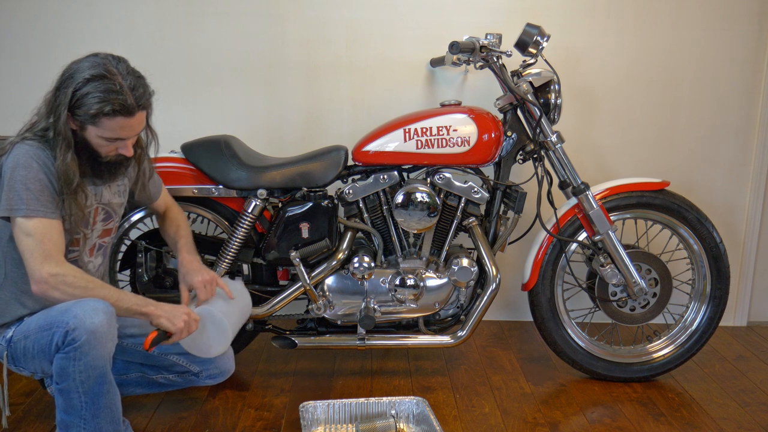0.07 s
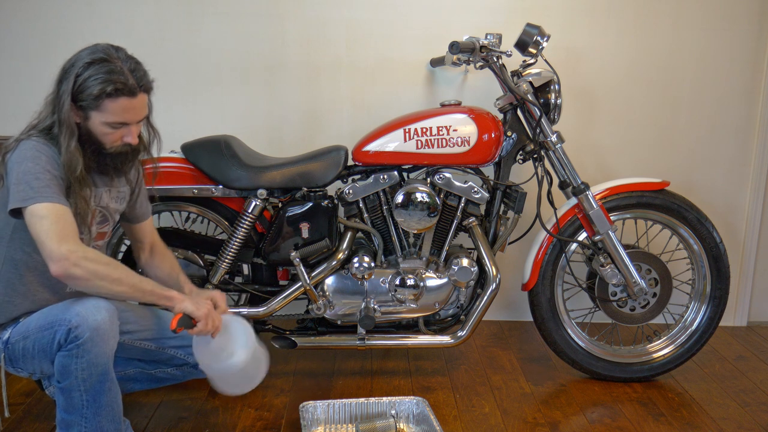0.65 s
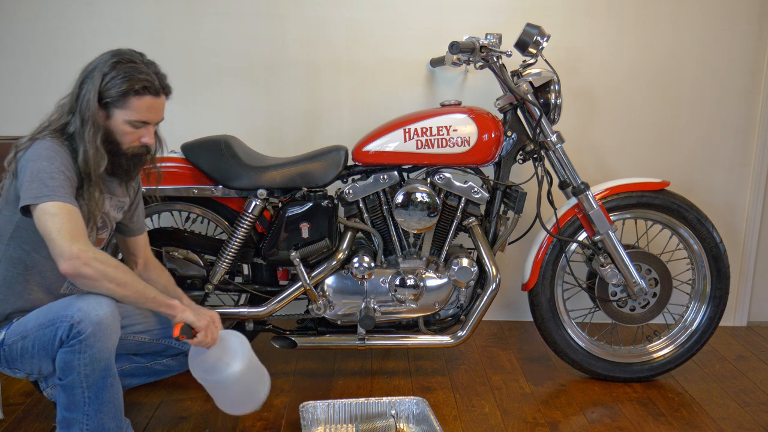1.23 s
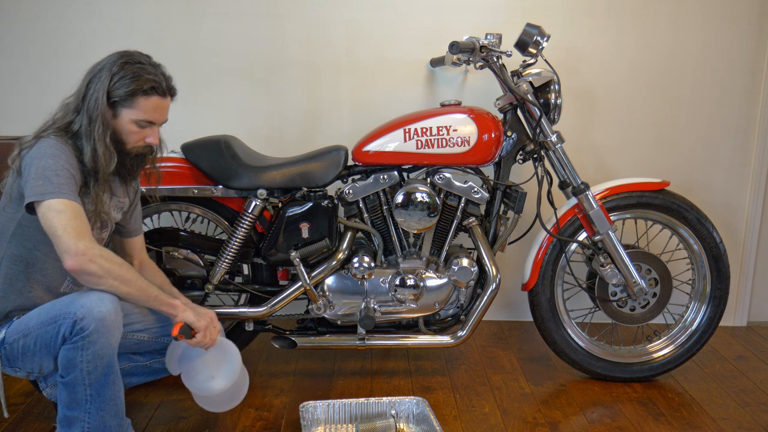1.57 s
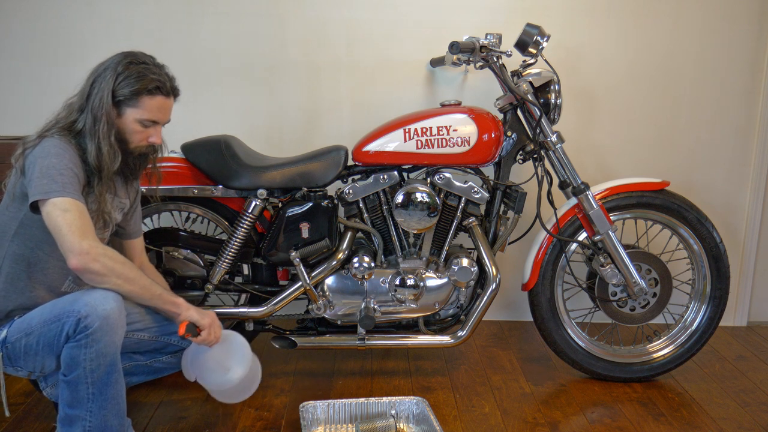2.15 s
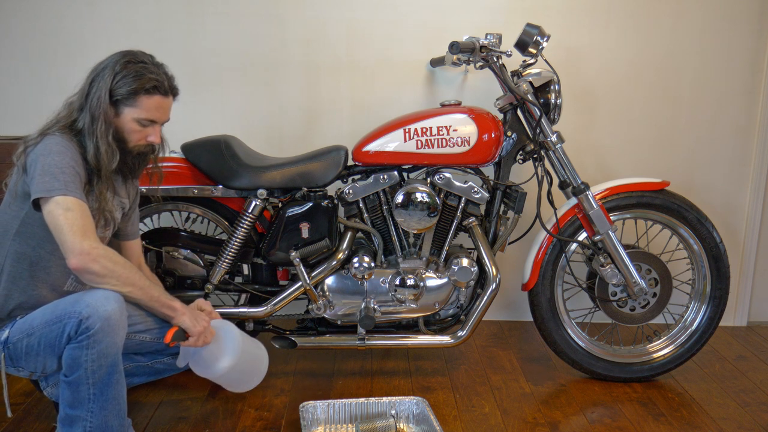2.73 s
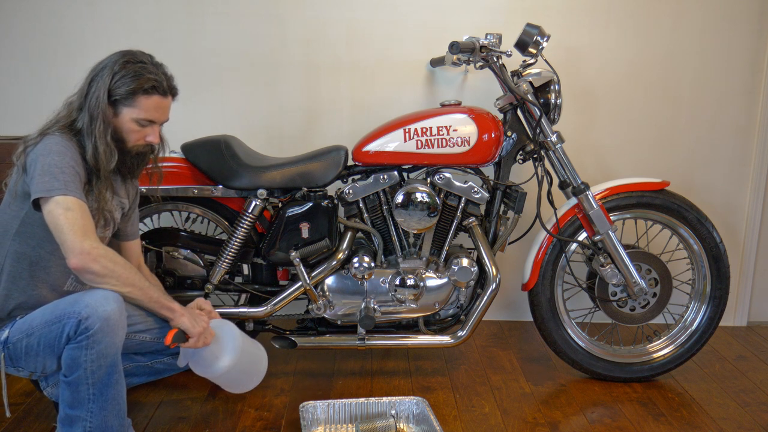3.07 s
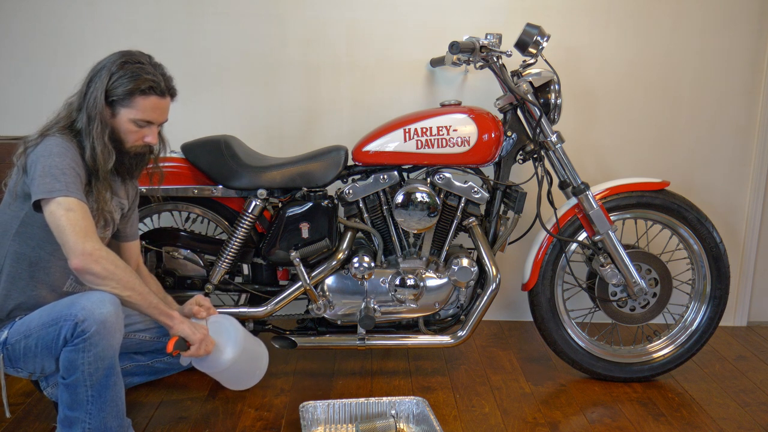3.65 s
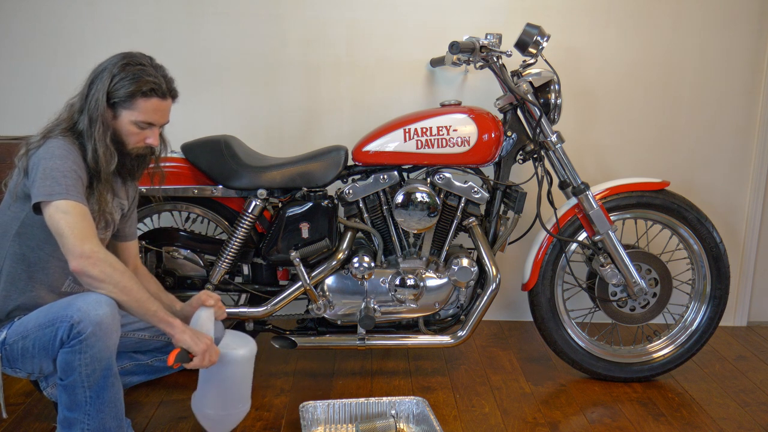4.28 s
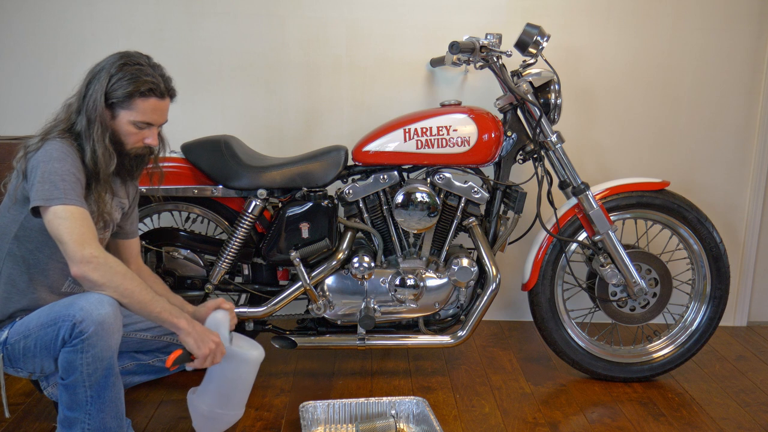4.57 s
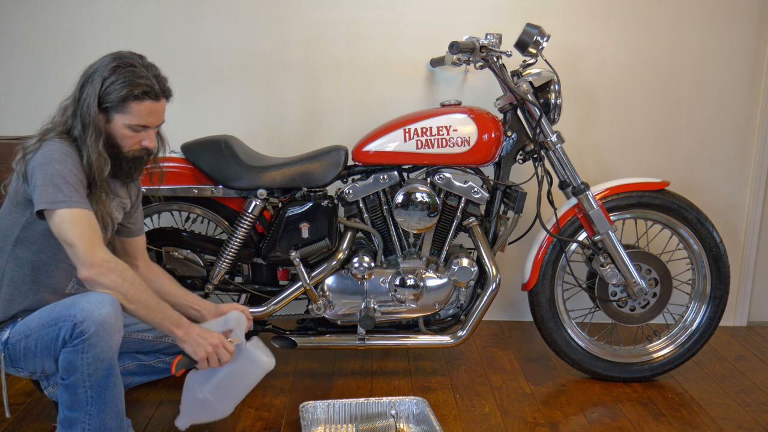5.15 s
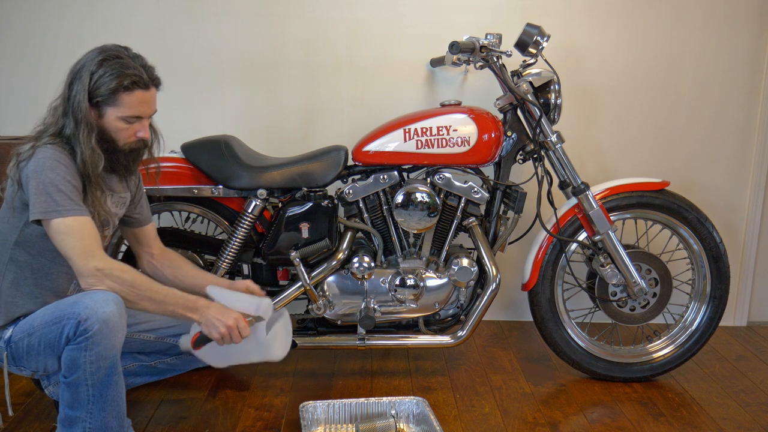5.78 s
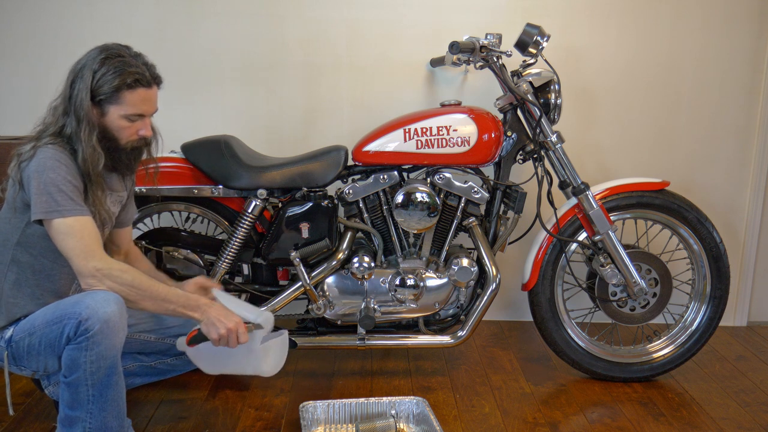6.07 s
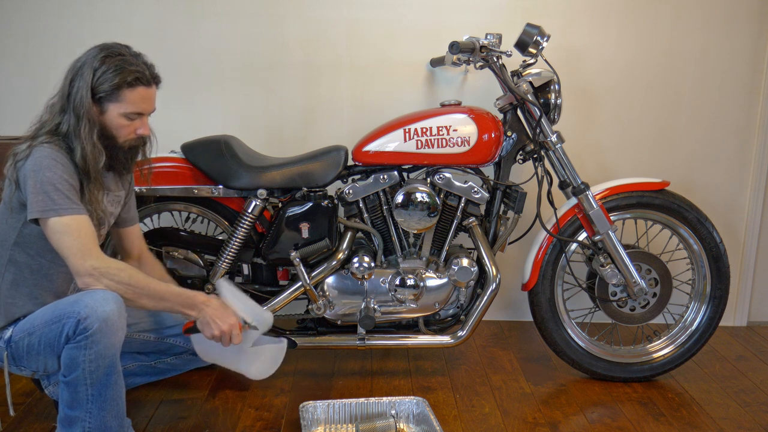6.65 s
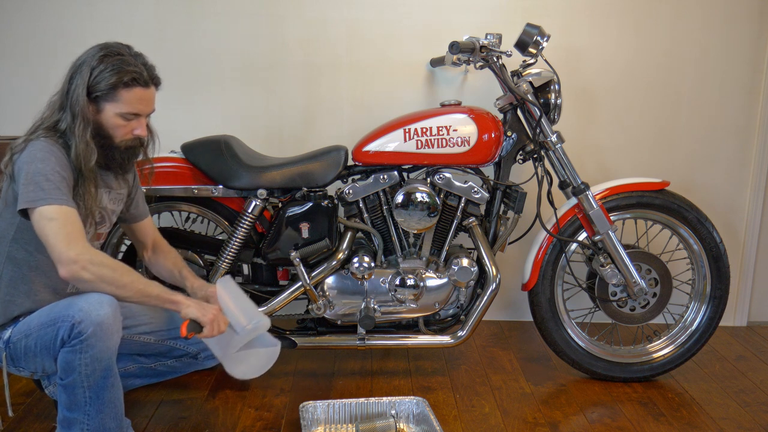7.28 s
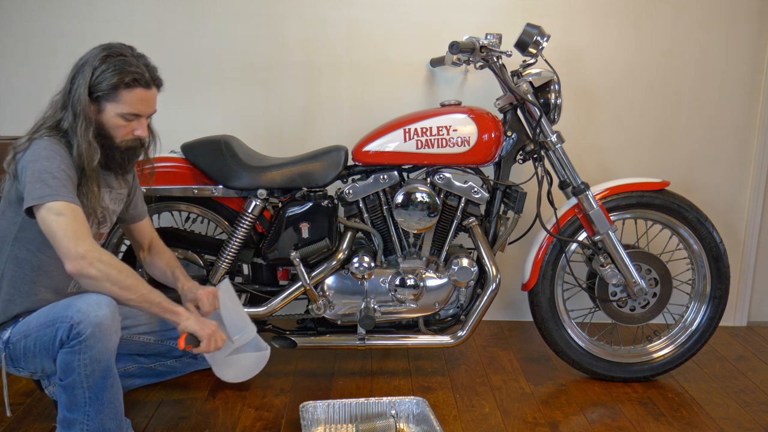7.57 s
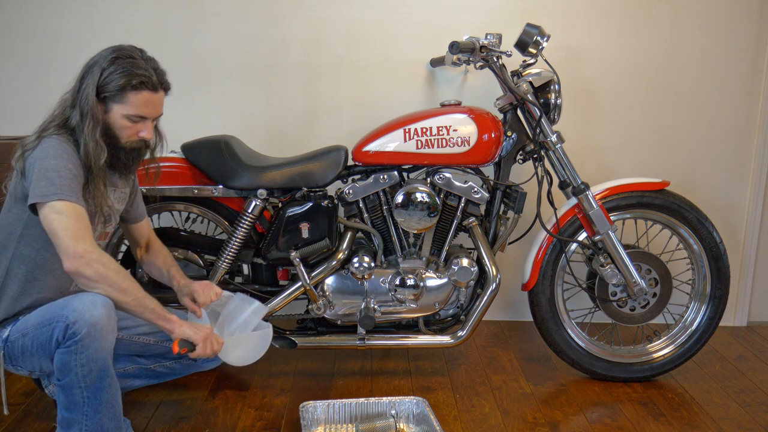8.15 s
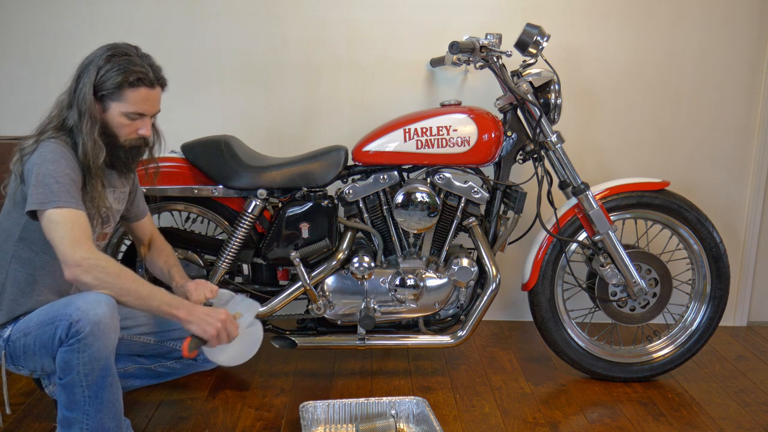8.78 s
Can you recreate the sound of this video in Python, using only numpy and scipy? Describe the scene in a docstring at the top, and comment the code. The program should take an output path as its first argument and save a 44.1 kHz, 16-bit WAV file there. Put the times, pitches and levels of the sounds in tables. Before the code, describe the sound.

A blade rasps through a hollow plastic jug in uneven bursts, with sharp snaps, loud pops and dull bumps.

```python
"""A hand blade rasps into a thin plastic jug in a garage, over a faint low hum and soft room noise.
The blade sticks and slips with each push, tearing tiny cracks, and the plastic snaps as it breaks through.
The wall buckles with loud pops near the start and near the middle. Hands bump the jug, and the blade
squeaks where it catches. The hollow jug rings with all of this, with different tones once it is slit,
and the room adds short echoes."""
import sys
import numpy as np
from scipy import signal
from scipy.fft import rfft, irfft, next_fast_len
from scipy.io import wavfile
from scipy.ndimage import uniform_filter1d

SR = 44100
rng = np.random.default_rng(int(sys.argv[2]) if len(sys.argv) > 2 else 0)


def log_audio(samples):
    """Write samples as a 16-bit WAV file to the path given in sys.argv[1]."""
    # one column per channel
    frames = np.atleast_2d(samples).T
    # limit to full scale, then quantise
    limited = np.clip(frames, -1, 1)
    pcm = np.round(limited * 32767).astype(np.int16)
    wavfile.write(sys.argv[1], SR, pcm)


N = 397341

# how strong each frequency is in one crack of the plastic: f/Hz, level/dB
CRACK_SPECTRUM = [(40, -20.5), (100, -9), (170, -13.5), (230, -2), (380, 1.5), (900, 3.5), (1300, 0.5),
                  (2100, 1), (3200, -3.5), (5000, -9), (7000, -16.5), (10000, -23.5), (15500, -38)]


def amp(db):
    """Turns decibels into a factor to multiply by."""
    return 10 ** (np.asarray(db) / 20)


def unit_level(x):
    """Scales a sound to an average (rms) level of 1."""
    return x / np.sqrt(np.mean(x ** 2) + 1e-20)


def set_attack_level(x, db, samples=1100):
    """Scales a sound so that its first moments have the given level."""
    return amp(db) * x / np.sqrt(np.mean(x[:samples] ** 2) + 1e-20)


def look_up(points, hz):
    """Reads between the rows of a table, along a logarithmic frequency axis."""
    f, value = np.transpose(points)
    return np.interp(np.log(hz + 1), np.log(f + 1), value)


def add(mix, start_s, sound):
    """Adds a sound to the mix at the given time."""
    part = mix[max(round(start_s * SR), 0):][:len(sound)]
    part += sound[:len(part)]


def click(spectrum, size=4096):
    """The sharpest click that has the given spectrum."""
    hz = abs(np.fft.fftfreq(size, 1 / SR))
    log_gain = np.log(amp(look_up(spectrum, hz)))
    return np.fft.ifft(np.exp(np.conj(signal.hilbert(log_gain)))).real[:size // 2]


def noise(spectrum, channels):
    """Steady noise of level 1 with the given spectrum."""
    size = next_fast_len(N)
    colour = amp(look_up(spectrum, np.fft.rfftfreq(size, 1 / SR)))
    white = rng.standard_normal((channels, size))
    return unit_level(irfft(rfft(white) * colour, size))[:, :N]


def three_bands(x, thud_top_hz=700, crack_top_hz=3500):
    """Splits a sound into thud (low), crack (middle) and fizz (high)."""
    edges = [(thud_top_hz, "low"), ([thud_top_hz, crack_top_hz], "band"), (crack_top_hz, "high")]
    return [signal.sosfilt(signal.butter(3, hz, kind, fs=SR, output="sos"), x) for hz, kind in edges]


def tiny_cracks(size, per_s, spread_db):
    """Tiny breaks at random moments; a wide spread makes a few much larger than the rest."""
    heights = amp(spread_db * np.minimum(rng.exponential(1, size), 4)) * rng.choice([-1, 1], size)
    return unit_level(heights * (rng.random(size) < per_s / SR))


def rasp(slip_db=1.5, slips_per_s=90, fade_s=0.0027):
    """The blade sticks and slips, tearing the wall in clumps of tiny cracks; each push builds and eases."""
    # pushes of the blade: start/s, build-up/s, easing/s, then at full force thud/dB, crack/dB, fizz/dB
    pushes = [(0.0, 0.004, 0.13, -43, -49, -54), (0.1, 0.044, 0.07, -39, -48.5, -49.5),
              (0.25, 0.059, 0.18, -36, -39, -57.5), (0.89, 0.12, 0.07, -44, -49.5, -61),
              (1.119, 0.068, 0.1, -57, -62, -67.5), (1.31, 0.071, 0.04, -57, -56, -58),
              (2.08, 0.039, 0.34, -58, -58.5, -65), (2.17, 0.11, 0.35, -57, -58.5, -62.5),
              (2.4, 0.091, 0.81, -66.5, -66, -68), (2.97, 0.24, 0.087, -56, -57.5, -63),
              (3.19, 0.07, 0.076, -53.5, -57, -61.5), (3.4, 0.26, 0.085, -53.5, -53.5, -57.5),
              (3.82, 0.077, 0.038, -39.5, -43.5, -48.5), (3.895, 0.061, 0.035, -24.5, -22.5, -28.5),
              (4.13, 0.059, 0.13, -32, -38, -48.5), (4.26, 0.016, 0.12, -43, -34, -46),
              (4.39, 0.038, 0.22, -51, -35, -44), (4.66, 0.077, 0.31, -51, -47.5, -56),
              (4.761, 0.16, 0.11, -55.5, -40, -47.5), (5.27, 0.04, 0.07, -48, -63, -58.5),
              (5.42, 0.024, 0.11, -42, -38, -49.5), (5.621, 0.054, 0.051, -42.5, -42.5, -46),
              (5.73, 0.16, 0.055, -38, -36.5, -41.5), (5.95, 0.084, 0.31, -51, -56, -74),
              (6.09, 0.059, 0.16, -44, -32, -46.5), (6.18, 0.13, 0.2, -37, -40, -55),
              (6.475, 0.016, 0.44, -56, -45, -50.5), (6.65, 0.027, 0.11, -43, -39, -46.5),
              (6.69, 0.065, 0.13, -42.5, -41, -50), (6.87, 0.033, 0.14, -55, -34, -43.5),
              (7.3, 0.069, 0.18, -69, -54.5, -61.5), (7.45, 0.091, 0.13, -47, -41, -46),
              (7.571, 0.075, 0.071, -49.5, -46, -51.5), (7.72, 0.19, 0.049, -47, -42.5, -49),
              (8.21, 0.053, 0.15, -45.5, -35, -43), (8.33, 0.15, 0.12, -38.5, -31.5, -41),
              (8.73, 0.072, 0.12, -45.5, -41.5, -51), (8.87, 0.064, 0.095, -46.5, -39, -45.5)]
    out, one_crack = np.zeros(N), click(CRACK_SPECTRUM)
    for start, build, ease, *levels_db in pushes:
        t = np.arange(0, max(build + ease, 0.03), 1 / SR)
        force_db = np.interp(t, [0, build, build + ease], [-17, 0, -23.5])
        slips = np.interp(t * slips_per_s, np.arange(500), rng.standard_normal(500))
        tear = tiny_cracks(len(t), per_s=2500, spread_db=2.0) * amp(slip_db * slips)
        tear = signal.fftconvolve(tear, one_crack)
        sound = signal.fftconvolve(tear, jug_ring(start, detune=0.034, ring_db=-1.5))
        bands = three_bands(flex(sound, depth_db=3.36)[:len(t)])
        sound = sum(unit_level(band) * amp(db + force_db) for band, db in zip(bands, levels_db))
        fade = np.clip(np.minimum(t, t[-1] - t) / fade_s, 0, 1)
        add(out, start, garage(fade * sound, tail_db=-3.5, echo_db=-12.5))
    return out


def jug_ring(at_s, detune, ring_db, size=10000, slit_s=4.03):
    """One click and the jug's ringing after it; the hand's grip shifts each tone a little."""
    # the tones of the whole jug and of the slit jug: f/Hz, level/dB, time to fade by 60 dB/s
    whole_tones = [(196, 13.5, 0.46), (231.2, 18.5, 0.15), (284, 12, 0.51), (351.6, 15, 0.33),
                   (415, 17.5, 0.14), (452, -1, 0.069), (574.5, -11.5, 0.2), (755.5, 6.5, 0.56),
                   (908, 6.5, 0.069), (954, 1, 0.11), (1160, -3, 0.22), (1447.6, 11, 0.095),
                   (1656, 3.5, 0.078), (2950, -6.5, 0.05)]
    slit_tones = [(159.7, 17.2, 0.22), (240, 6, 0.32), (347.3, 15.7, 0.52), (433.5, 13.4, 0.15),
                  (504.6, 9.1, 0.13), (598.6, 9.3, 0.11), (689, 7.7, 0.13), (922, 9.2, 0.059),
                  (1070, 8.8, 0.19), (1575, 2.9, 0.047), (1690, 1.8, 0.24), (2730, 2.5, 0.054),
                  (4210, 1.1, 0.081)]
    t = np.arange(size) / SR
    ring = np.zeros(size)
    ring[0] = 1
    for hz, db, decay_s in whole_tones if at_s < slit_s else slit_tones:
        damping = np.log(1000) / decay_s
        shifted_hz = hz * (1 + detune * rng.standard_normal())
        strength = amp(db + ring_db) * 2 * damping / SR
        ring += strength * np.exp(-damping * t) * np.cos(2 * np.pi * shifted_hz * t)
    return ring


def flex(x, depth_db):
    """As the plastic bends, its small ringing tones come and go."""
    spectra = signal.stft(x, nperseg=1024, noverlap=768)[2]
    wobble = uniform_filter1d(rng.standard_normal(spectra.shape), size=9, axis=1)  # smooth in time
    wobble = unit_level(uniform_filter1d(wobble, size=5, axis=0))  # and in frequency
    return signal.istft(spectra * amp(depth_db * wobble), nperseg=1024, noverlap=768)[1][:len(x)]


def garage(x, tail_db, echo_db, build_s=0.0021):
    """Adds echoes off floor and walls, and a fading tail that differs wherever the jug is held."""
    # how long the room rings: f/Hz, time to fade by 60 dB/s
    decay_times = [(100, 0.54), (260, 0.23), (700, 0.2617), (1840, 0.344), (4850, 0.3158), (14000, 0.3)]
    # echoes off the nearest surfaces: delay/s, level relative to echo_db/dB
    echoes = [(0.0026, -21), (0.0062, -21.5), (0.0107, -0.5), (0.0206, -15), (0.031, -14.5), (0.036, -14)]
    hz, t, spectra = signal.stft(rng.choice([-1., 1.], size=18000), SR, nperseg=256)
    decay = amp(-60 * t / look_up(decay_times, hz)[:, None])
    tail = signal.istft(spectra * decay * (1 - np.exp(-t / build_s)), SR, nperseg=256)[1]
    response = amp(tail_db) * tail / np.linalg.norm(tail)
    response[0] += 1  # the direct sound
    for delay, db in echoes:
        add(response, delay, amp([db + echo_db]))
    return signal.fftconvolve(x, response)


def hum(pitch_hz=97.6, waver=0.0031):
    """One low, slightly unsteady tone that fades away and partly returns."""
    # how loud the hum is: t/s, level/dB
    loudness = [(0, -58.5), (1.5, -57.5), (2.3, -61), (3.0, -65), (3.7, -65.5), (5.0, -76), (9.0, -68.5)]
    t = np.arange(N) / SR
    drift = np.interp(t * 4, np.arange(60), rng.standard_normal(60))
    cycles = np.cumsum(pitch_hz * (1 + waver * drift)) / SR
    return amp(np.interp(t, *np.transpose(loudness))) * unit_level(np.sin(2 * np.pi * cycles))


def room_noise(air_db=-59.5, hiss_db=-72):
    """Steady room noise, with a little hiss and rumble of its own in each channel."""
    # still air, the same in both channels: f/Hz, relative level/dB
    air_spectrum = [(20, -15.5), (42, -9), (65, -6), (100, -8), (160, -2.5), (300, -9.5), (440, -8),
                    (560, -17), (920, -16.5), (1300, -21.5), (3000, -23.5), (8000, -32.5), (15000, -38.5)]
    # each channel's own hiss and rumble: f/Hz, relative level/dB
    hiss_spectrum = [(12, -33), (20, -2.5), (171, -5), (452, -4.5), (597, -7), (649, -8.5), (2680, -10),
                     (15500, -13)]
    return amp(air_db) * noise(air_spectrum, channels=1) + amp(hiss_db) * noise(hiss_spectrum, channels=2)


def snaps():
    """The blade breaks through a bit of wall with a sharp crack."""
    # breaks in the wall: t/s, thud/dB, crack/dB, fizz/dB, pitch of the patch/Hz, rise/s, splintering/s
    breaks = [(0.1547, -36, -37.5, -58, 392, 0.00064, 0.028), (0.35, -48, -42.5, -49, 2980, 0.0012, 0.017),
              (3.889, -33, -52, -53, 197, 0.0041, 0.034), (3.968, -25, -22.5, -29.5, 1490, 0.0009, 0.04),
              (4.07, -49, -36.5, -38, 3880, 0.00086, 0.043), (4.263, -54, -40.5, -43, 1700, 0.0034, 0.057),
              (4.395, -66, -42.5, -46.5, 2470, 0.0045, 0.039),
              (5.786, -64, -43.5, -48, 2970, 0.0029, 0.036), (5.82, -64, -44, -45.5, 1640, 0.0033, 0.039),
              (5.851, -57, -34.5, -41, 3720, 0.003, 0.086), (5.879, -37.5, -33.5, -40, 3400, 0.0028, 0.03),
              (6.087, -51, -44, -47, 3620, 0.00078, 0.14), (6.096, -45.5, -35, -37.5, 3680, 0.0014, 0.26),
              (6.318, -45, -29.5, -40, 1150, 0.0028, 0.095), (6.826, -45, -31.5, -30.5, 4530, 0.00082, 0.1),
              (6.856, -37.5, -24, -32.5, 1050, 0.0032, 0.032),
              (8.021, -41.5, -37, -49.5, 1120, 0.0015, 0.12), (8.066, -47, -35, -47.5, 1420, 0.0031, 0.042),
              (8.114, -50, -30.5, -38.5, 754, 0.0014, 0.18),
              (8.132, -28.5, -22.5, -32.5, 924, 0.0012, 0.11), (8.218, -35, -29.5, -39, 670, 0.0011, 0.078),
              (8.303, -40, -34.5, -46, 2550, 0.0024, 0.014), (8.407, -41, -34, -38, 960, 0.003, 0.025),
              (8.463, -34, -33, -39.5, 975, 0.00092, 0.035), (8.606, -56, -50, -56, 3300, 0.00079, 0.037),
              (8.733, -54, -49, -54, 1880, 0.0015, 0.09), (8.806, -44.5, -42, -65, 930, 0.0025, 0.015),
              (8.842, -66, -37, -54, 910, 0.001, 0.056), (8.936, -46, -43.5, -40.5, 3960, 0.00097, 0.051)]
    out = np.zeros(N)
    for at_s, *levels_db, hz, rise_s, decay_s in breaks:
        add(out, *burst(at_s, levels_db, hz, rise_s, decay_s, patch_db=3.5, jug_db=-2.5))
    return out


def burst(at_s, levels_db, hz, rise_s, decay_s, patch_db, jug_db):
    """A patch of wall gives way in a quickly dying shower of cracks; returns start time and sound."""
    t = np.arange(SR // 8) / SR
    growth_db = np.minimum(-15 * (2 - t / rise_s), 0)
    decay_db = -60 * (t - 3.7 * rise_s) / decay_s  # a slow start also lingers at its top
    shower = tiny_cracks(len(t), per_s=6500, spread_db=0.34) * amp(np.minimum(growth_db, decay_db))
    patch_ring = signal.lfilter(*signal.iirpeak(hz, Q=12.0, fs=SR), shower)  # the patch's own pitch
    sound = signal.fftconvolve(shower + amp(patch_db) * patch_ring, click(CRACK_SPECTRUM))
    sound = signal.fftconvolve(sound, jug_ring(at_s, detune=0.035, ring_db=jug_db))
    sound = sum(set_attack_level(band, db) for band, db in zip(three_bands(sound), levels_db))
    return at_s - rise_s, garage(sound, tail_db=-3.0, echo_db=-10)


def pops(push_db=-2, crack_db=-3, crack_s=0.016):
    """A side of the jug flips through: a push of air and a brief crack, then it rattles and rings."""
    # the wall buckles: t/s, level/dB, push/s, rattle in the blend/dB, rattle/s, low edge/Hz, high edge/Hz
    buckles = [(0.195, -15, 0.0002, -6, 0.28, 190, 2200), (0.2003, -17.5, 0.00031, -2.5, 0.047, 120, 1510),
               (4.0928, -13, 0.00031, 0.5, 0.13, 95, 2660)]
    # how strong each frequency is in the rattling wall: f/Hz, level/dB
    rattle_spectrum = [(40, -23), (120, -16.5), (200, -3), (450, 11), (700, 4.5), (1000, -11.5),
                       (1800, -15.5), (3200, -12.5), (5000, -12), (15500, -5.5)]
    out, t = np.zeros(N), np.arange(SR // 4) / SR
    for at_s, db, push_s, rattle_db, rattle_s, low_hz, high_hz in buckles:
        push = (1 - t / push_s) * np.exp(-t / push_s)
        push = signal.lfilter(*signal.butter(1, 1500, fs=SR), push)  # a broad wall softens the edge
        crack = tiny_cracks(len(t), per_s=6500, spread_db=3.5) * amp(-60 * t / crack_s)
        crack = signal.fftconvolve(crack, click(CRACK_SPECTRUM))[:len(t)]
        rattle = tiny_cracks(len(t), per_s=2500, spread_db=4.0) * amp(-60 * t / rattle_s)
        rattle = signal.fftconvolve(rattle, click(rattle_spectrum))[:len(t)]
        blow = amp(push_db) * unit_level(push) + amp(crack_db) * unit_level(crack)
        blow += amp(rattle_db) * unit_level(rattle)
        # trim each pop's deep bass and high treble
        blow = signal.lfilter(*signal.butter(2, [low_hz, high_hz], "band", fs=SR), blow)
        sound = signal.fftconvolve(blow, jug_ring(at_s, detune=0.002, ring_db=-2.9, size=16000))
        add(out, at_s, garage(set_attack_level(sound, db), tail_db=-3, echo_db=-24.0))
    return out


def knocks(rise_s=0.0028):
    """Hand and blade make dull, hollow bumps as the jug is gripped and turned."""
    # bumps on the jug: t/s, thud/dB, crack/dB, pitch of the struck patch/Hz, fade/s
    bumps = [(0.597, -60, -80, 230, 0.026), (0.689, -44, -56, 325, 0.061), (0.784, -48, -48, 402, 0.045),
             (0.851, -52, -62, 395, 0.024), (0.982, -52, -48.5, 397, 0.043),
             (1.379, -44, -45.5, 238, 0.037), (1.399, -51.5, -48, 217, 0.012),
             (1.447, -75, -65, 220, 0.038), (1.803, -42.5, -50, 350, 0.12), (1.879, -45, -52.5, 394, 0.11),
             (1.907, -45, -51.5, 260, 0.081), (2.781, -46.5, -50.5, 300, 0.022),
             (3.164, -53.5, -59, 221, 0.065), (3.636, -43.5, -51.5, 348, 0.064),
             (4.44, -41.5, -41, 161, 0.11), (4.91, -54.5, -55, 159, 0.044),
             (5.165, -57.5, -46, 1830, 0.076), (5.255, -44, -46.5, 655, 0.07), (5.46, -55, -63, 160, 0.047),
             (5.606, -51, -51, 915, 0.05), (5.644, -48, -56, 215, 0.06), (5.881, -28, -34.5, 552, 0.11),
             (6.66, -47.5, -48, 159, 0.062), (6.86, -42, -36, 100, 0.041),
             (7.2214, -39.5, -46, 660, 0.0094)]
    out = np.zeros(N)
    for at_s, thud_db, crack_db, hz, decay_s in bumps:
        levels_db = (thud_db, crack_db, crack_db - 13.5)  # soft blows have little fizz
        add(out, *burst(at_s, levels_db, hz, rise_s, decay_s, patch_db=7.5, jug_db=-3.5))
    return out


def squeaks(rise_s=0.0037):
    """The blade catches, and one small patch rings high."""
    # catches of the blade: t/s, level/dB, f/Hz, fade/s
    catches = [(2.78, -53, 2710, 0.014), (5.448, -45.5, 3220, 0.08), (6.125, -35.5, 3000, 0.23),
               (6.572, -43, 2190, 0.056), (6.862, -24, 2860, 0.012), (7.346, -57, 2840, 0.048),
               (7.406, -51.5, 2680, 0.022)]
    out = np.zeros(N)
    for at_s, db, hz, decay_s in catches:
        levels_db = (db - 16, db, db - 6.5)  # thud, crack, fizz
        add(out, *burst(at_s, levels_db, hz, rise_s, decay_s, patch_db=13.5, jug_db=-15.5))
    return out


def scene():
    """The jug sits straight ahead; only a trace of the room differs between left and right."""
    # how much of the room's sound differs between the channels: f/Hz, level/dB
    width = [(100, -38.5), (500, -38), (2000, -34.5), (5000, -28), (9000, -19.5), (15000, -21)]
    jug = pops() + knocks() + snaps() + squeaks() + rasp()
    reflections = garage(jug, tail_db=1.0, echo_db=-11)[:N] - jug
    side = signal.fftconvolve(reflections, click(width))[:N]
    return np.array([jug + side, jug - side]) + hum() + room_noise()


def record(dry, dip_start_s=1.417, dip_end_s=1.438, dip_db=-31, top_hz=15850):
    """The level dips for an instant, peaks beyond full scale are clipped, and the top treble is cut."""
    t = np.arange(N) / SR
    gate = uniform_filter1d(1. - ((t > dip_start_s) & (t < dip_end_s)), size=60)
    clipped = np.clip(dry * np.maximum(gate, amp(dip_db)), -1, 1)
    low_pass = signal.firwin(511, top_hz, window=("kaiser", 9), fs=SR)
    return signal.oaconvolve(clipped, low_pass[None], "same")


dry = scene()
out = record(dry)
log_audio(out)
```